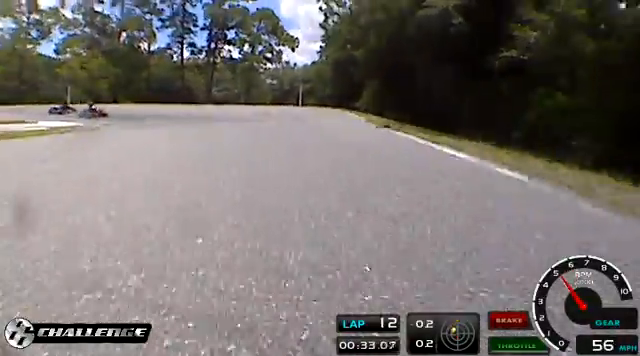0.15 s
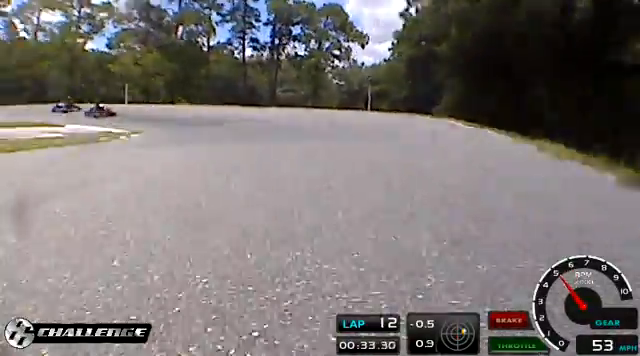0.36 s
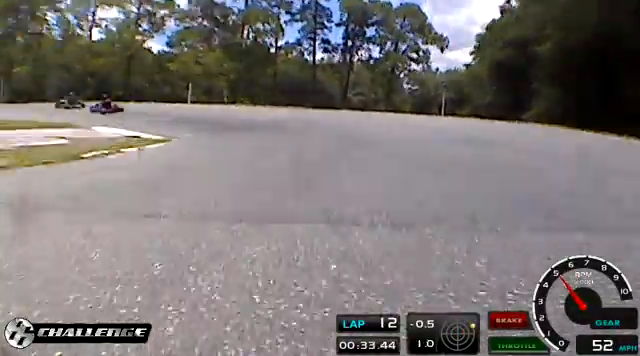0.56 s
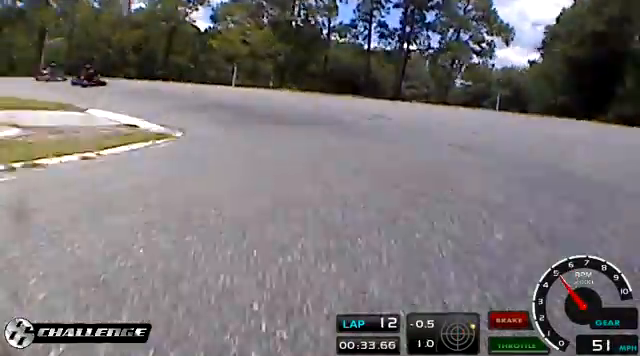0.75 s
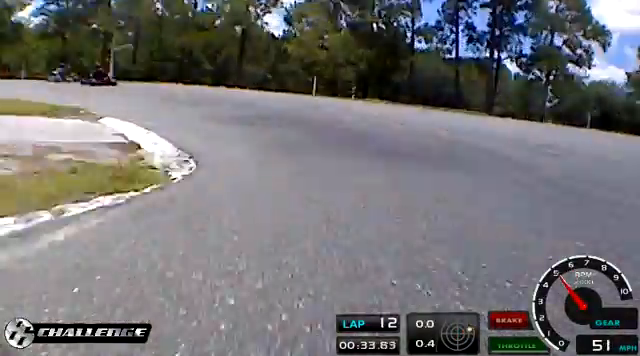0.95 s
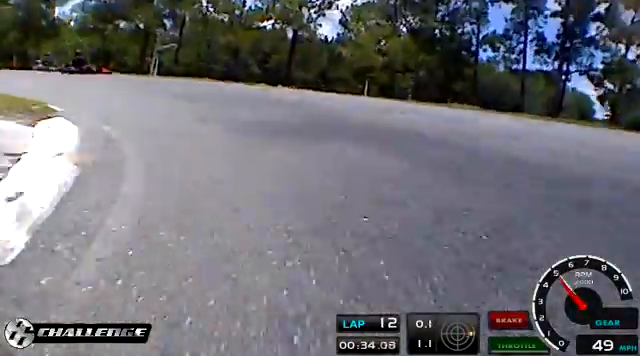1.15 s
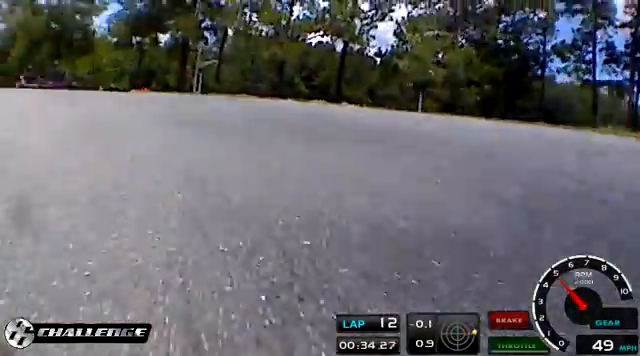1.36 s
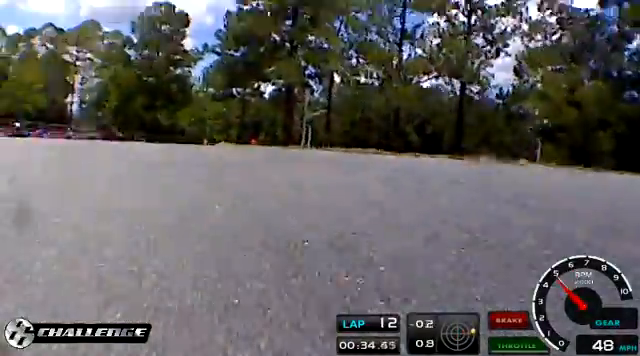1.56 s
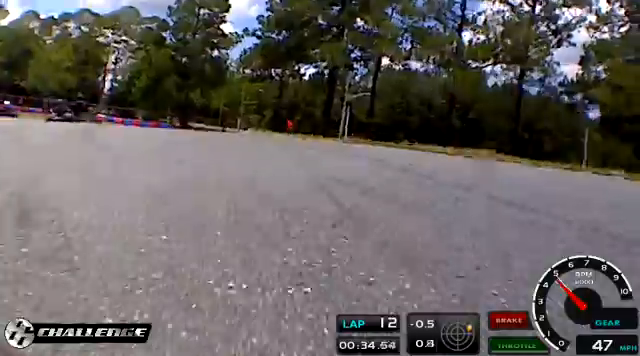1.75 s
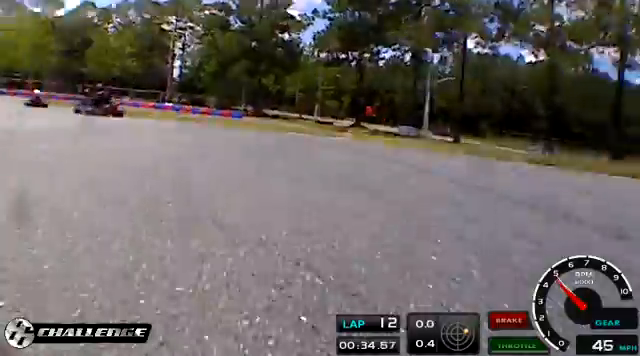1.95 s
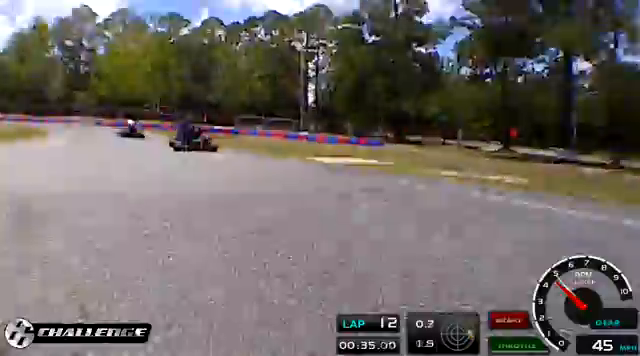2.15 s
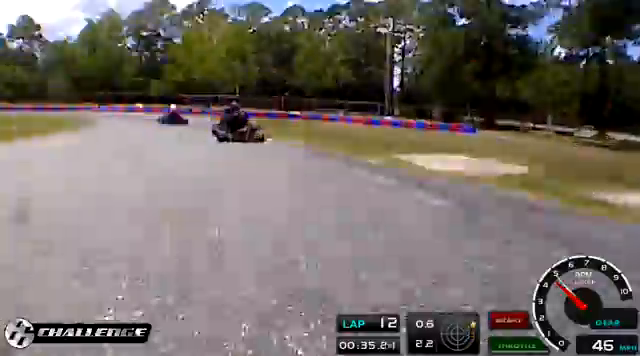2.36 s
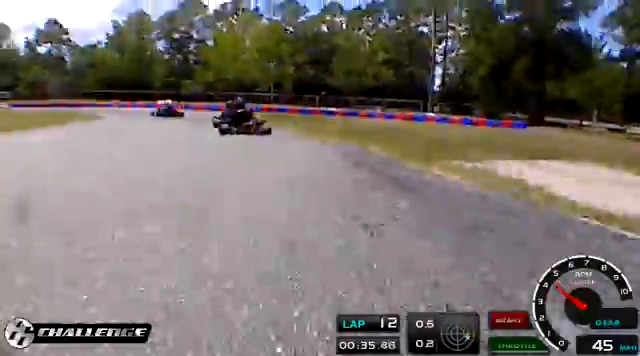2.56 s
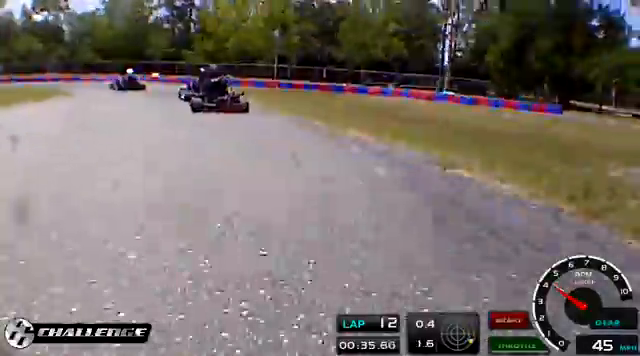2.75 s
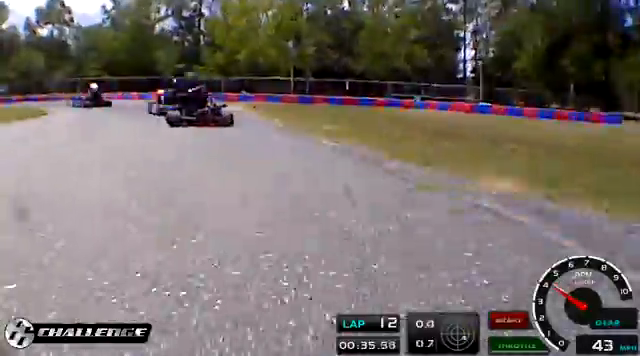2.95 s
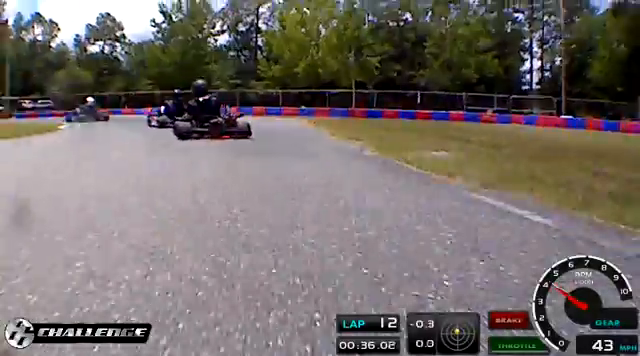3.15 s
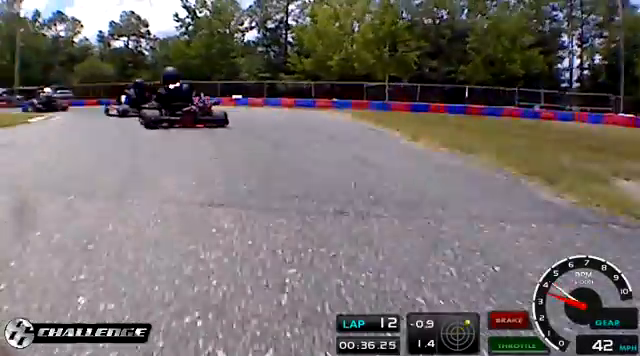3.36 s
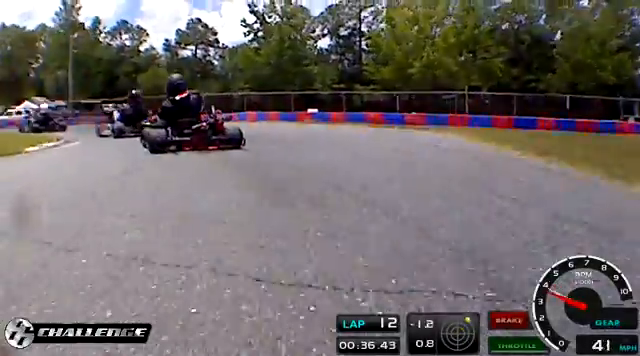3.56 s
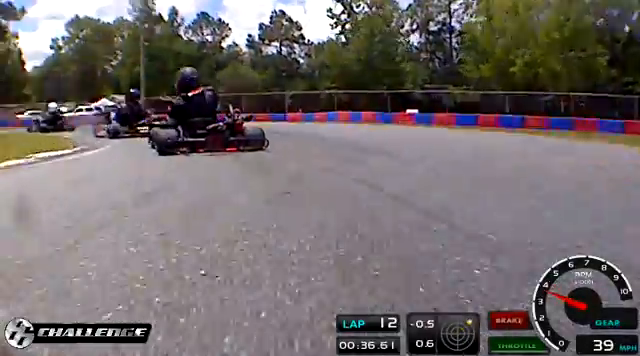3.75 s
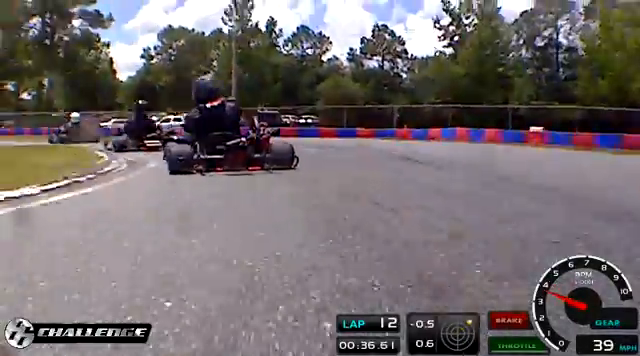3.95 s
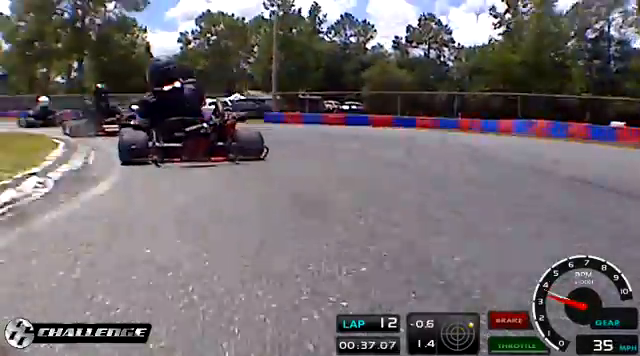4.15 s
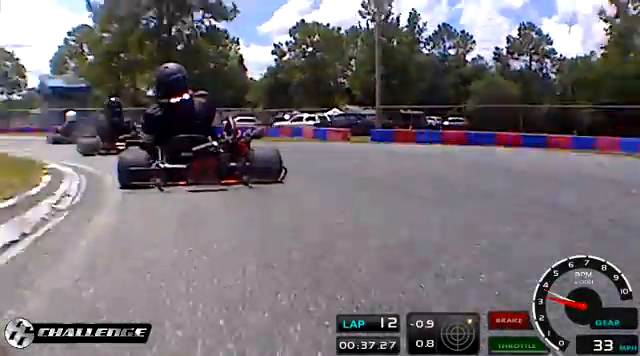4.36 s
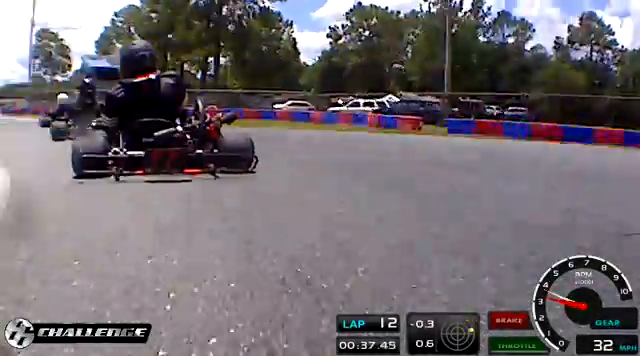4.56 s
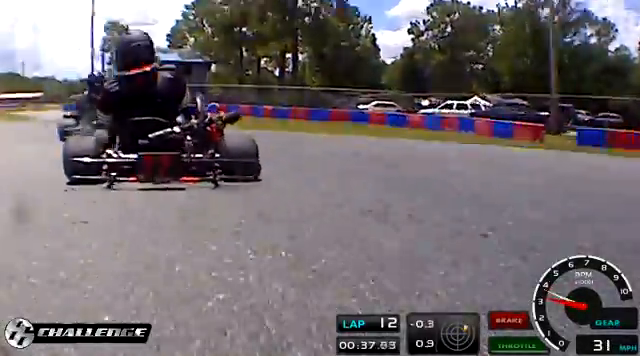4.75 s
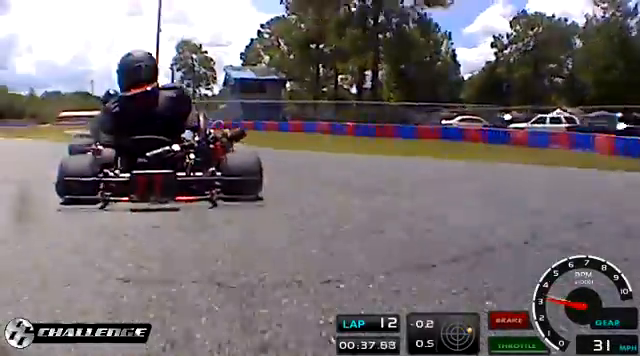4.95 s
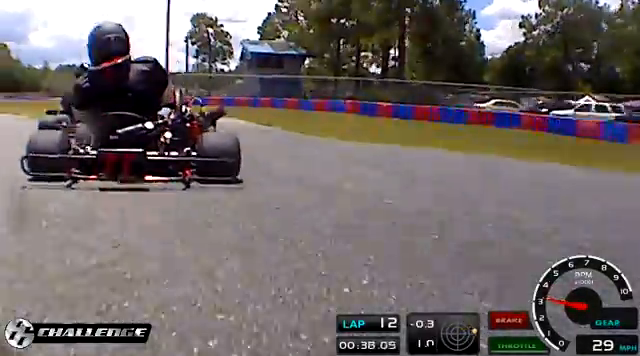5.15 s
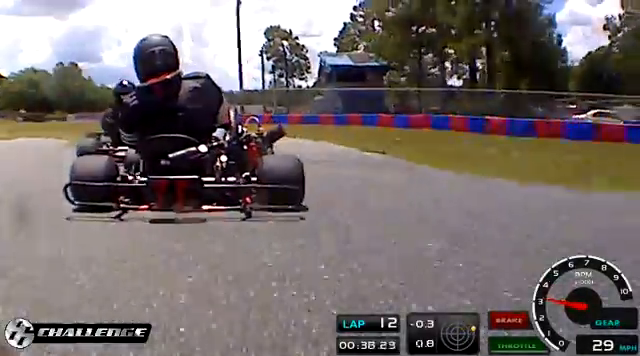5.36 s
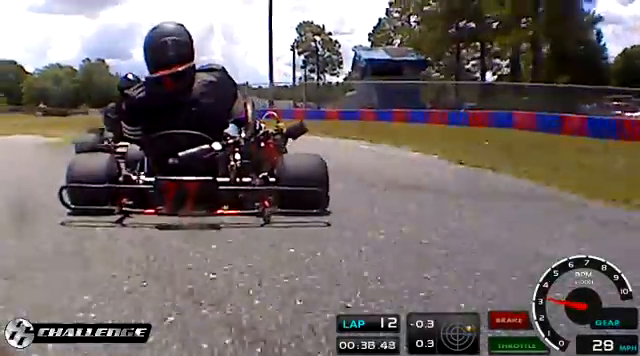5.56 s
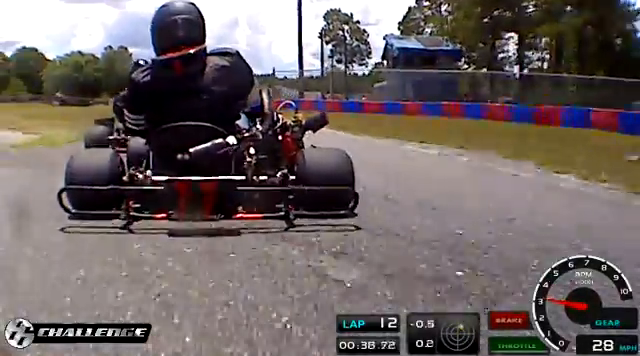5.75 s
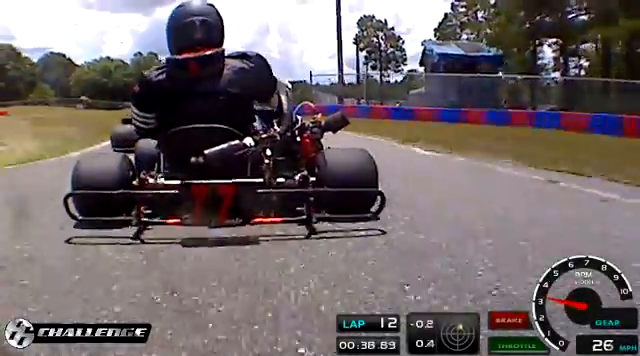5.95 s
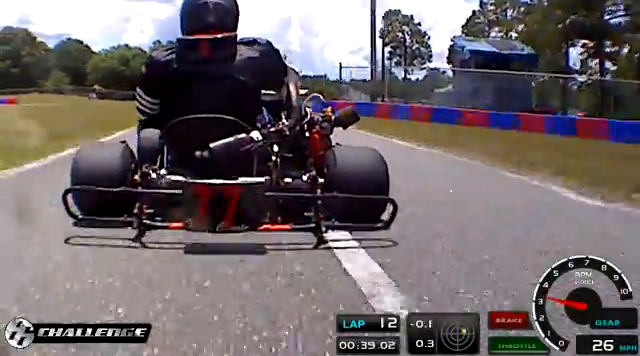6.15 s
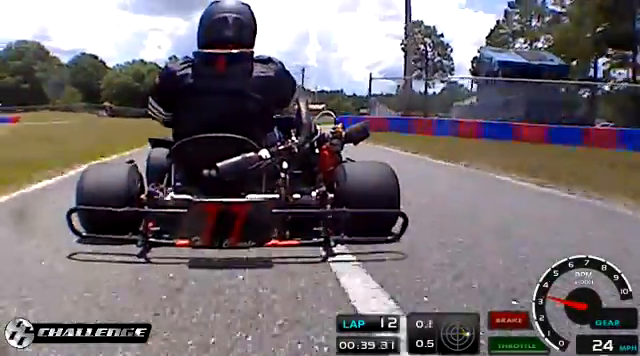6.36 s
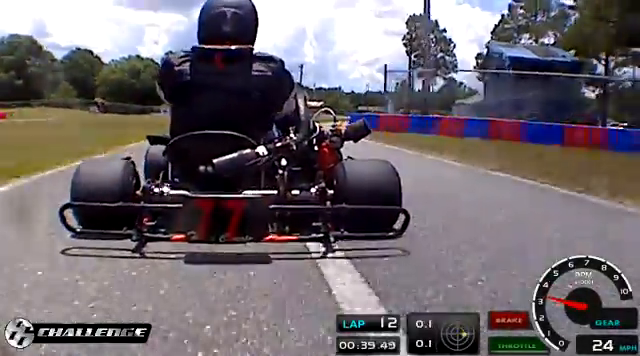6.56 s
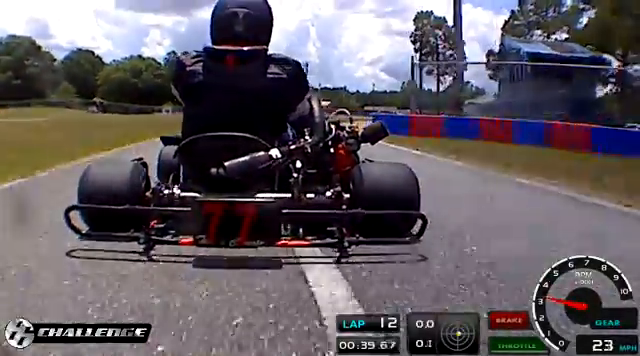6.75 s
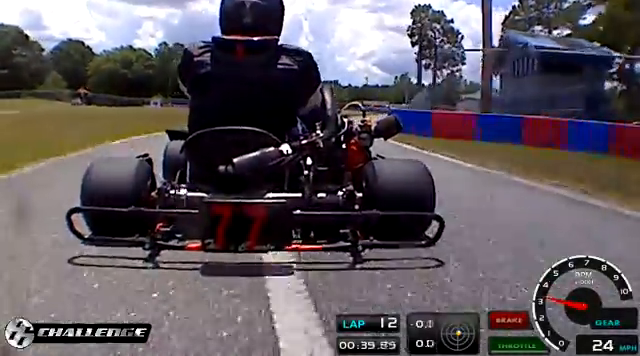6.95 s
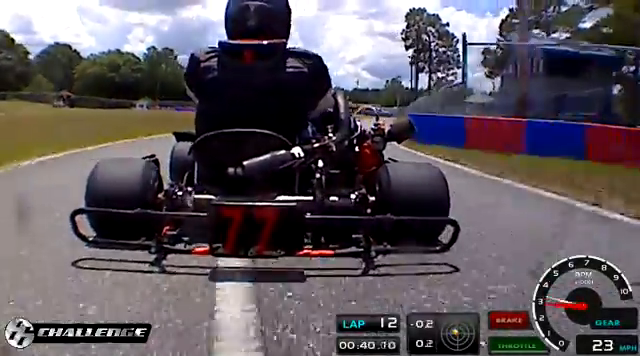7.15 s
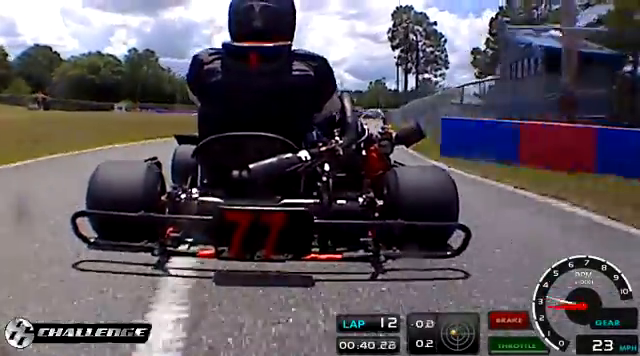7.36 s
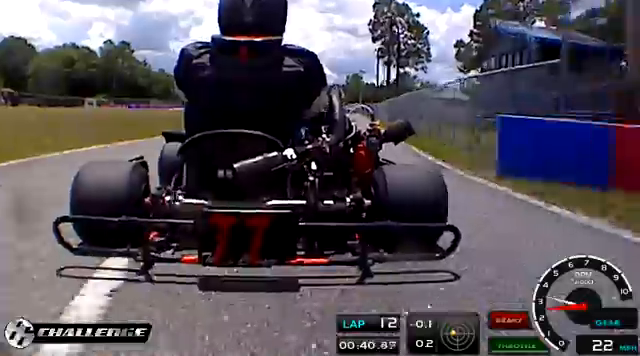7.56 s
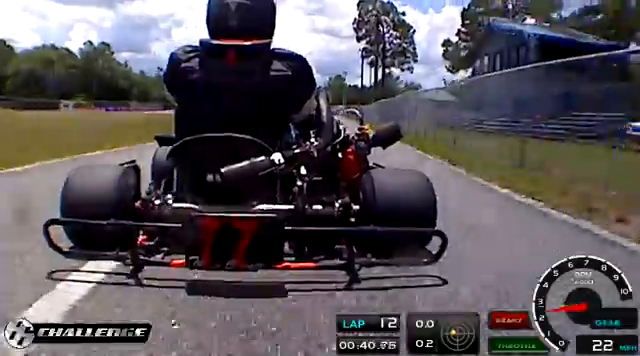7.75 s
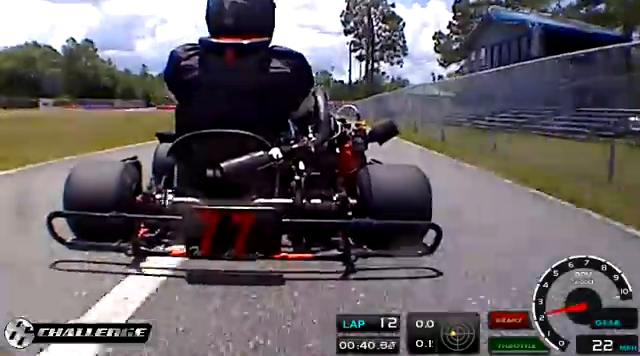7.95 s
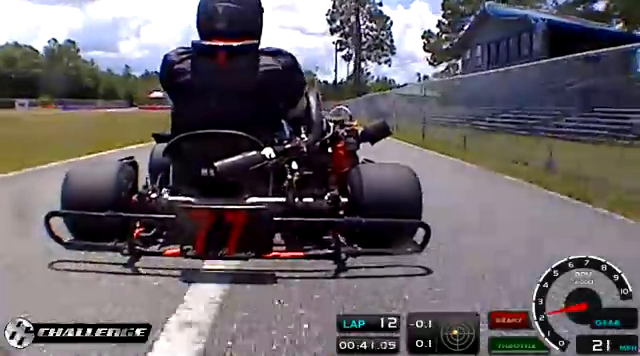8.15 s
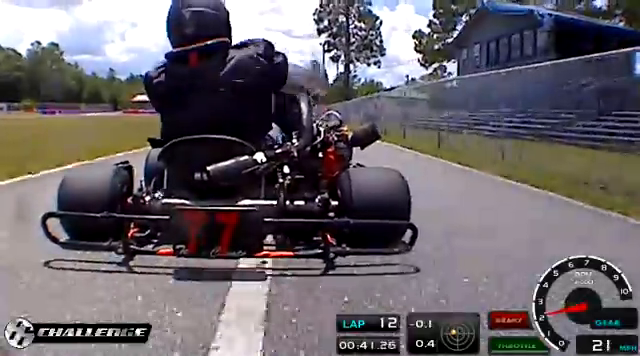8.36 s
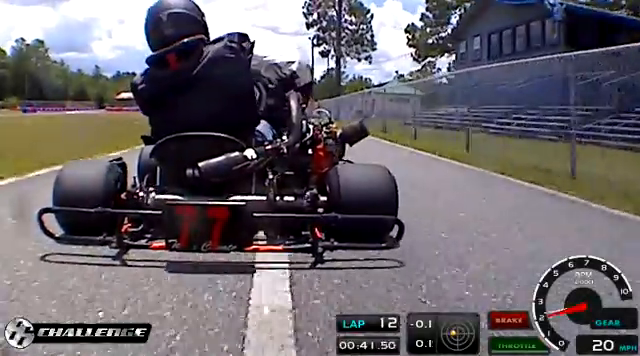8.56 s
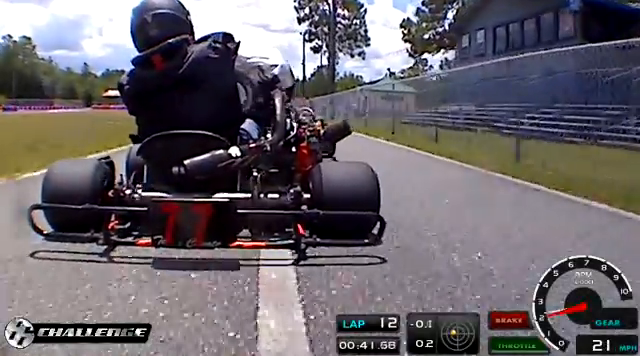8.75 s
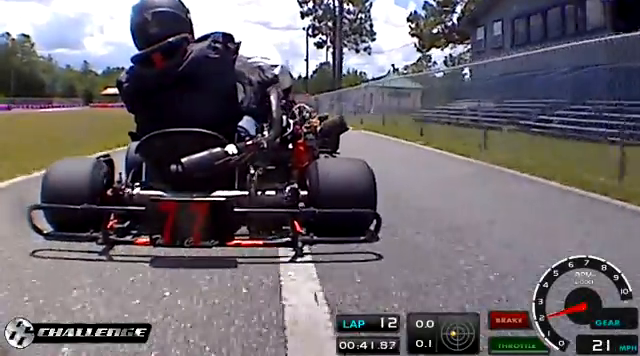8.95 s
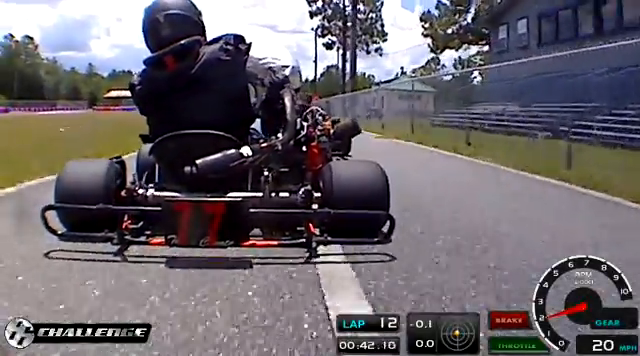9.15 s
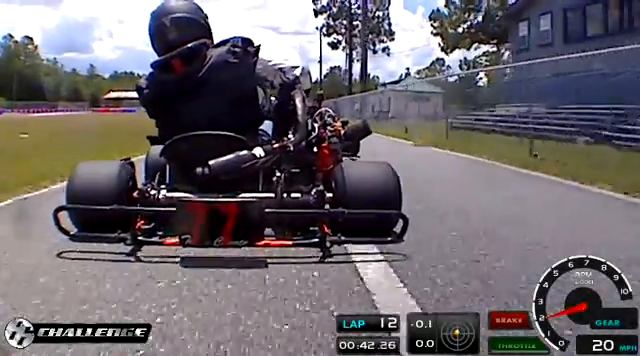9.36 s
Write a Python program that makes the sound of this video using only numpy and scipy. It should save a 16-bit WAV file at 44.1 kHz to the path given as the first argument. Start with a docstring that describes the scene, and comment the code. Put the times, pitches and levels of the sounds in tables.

```python
"""On board a four-stroke racing kart, the microphone shut in a camera case bolted to it: full speed to a crawl.
From the start the crank shakes the frame, firings and rough asphalt boom in the mount, wind drums on the
case, and roar, chatter, rattle and exhaust come through it; fittings knock for six seconds. The sound cuts
out for a fifth of a second at 4.3 s; revs pick up slightly, then metal clacks, likely the brake, from 6.2 s
as the kart slows. A second cut falls at 6.5 s; a slack chain slaps through the crawl, with one last clack."""
import sys
import numpy as np
from scipy import signal
from scipy.fft import rfft, irfft
from scipy.io import wavfile
from scipy.ndimage import uniform_filter1d

SR = 44100
rng = np.random.default_rng(int(sys.argv[2]) if len(sys.argv) > 2 else 0)


def waveform_to_disk(signal):
    """Save audio, clipped to [-1, 1], as 16-bit WAV at the path in sys.argv[1]."""
    frames = np.transpose(np.atleast_2d(signal))
    scaled = np.clip(frames, -1, 1) * 32767
    samples = np.round(scaled).astype(np.int16)
    wavfile.write(sys.argv[1], SR, samples)


N = 414099
TIME = np.arange(N) / SR
REFERENCE_HZ = 80  # crank turns per second at which each layer's _DB level holds
# Every _RISE_DB below is dB per doubling of crank speed.


def undb(db):
    """Turn decibels into an amplitude factor."""
    return 10 ** (np.asarray(db) / 20)


def unit(x):
    """Scale to an RMS of 1."""
    return x / np.sqrt(np.mean(x ** 2))


def noise():
    """White noise of the scene's length."""
    return rng.standard_normal(N)


def curves(rows):
    """Each column of a table as one value a sample."""
    seconds, *columns = np.transpose(rows)
    return [np.interp(TIME, seconds, column) for column in columns]


def swells(events):
    """Level in dB: each event rises and falls as a raised cosine."""
    total_db = 0
    for middle, length, db in events:
        phase = np.clip((TIME - middle) / length, -.5, .5)
        total_db = total_db + db * np.cos(np.pi * phase) ** 2
    return total_db


def walk(rate):
    """Smooth random wander of RMS 1, with a new target 'rate' times a second."""
    hold = int(SR / rate)
    steps = np.repeat(rng.standard_normal(N // hold + 1), hold)
    return unit(uniform_filter1d(steps, hold)[:N])


def colour(x, points, size=8192):
    """Causal minimum-phase filter with the given (Hz, dB) outline."""
    hz, db = np.transpose(points)
    bins_hz = np.arange(size // 2 + 1) * SR / size
    log_gain = np.log(undb(np.interp(np.log(bins_hz + 1), np.log(hz), db)))
    # Folding the cepstrum onto positive time makes the filter minimum-phase.
    cepstrum = irfft(log_gain)[:size // 2]
    cepstrum[1:] *= 2
    impulse = irfft(np.exp(rfft(cepstrum, size)))[:size // 2]
    return signal.fftconvolve(x, impulse)[:N]


def ring(x, modes):
    """Sum of damped resonances, each (Hz, width Hz, dB)."""
    return sum(undb(db) * signal.lfilter(*signal.iirpeak(hz, hz / width, SR), x) for hz, width, db in modes)


def grains(rate, spread_db):
    """Tiny impacts of either sign at random moments, their levels spread exponentially in dB."""
    size = undb(spread_db * np.minimum(rng.exponential(size=N), 4))
    return (rng.random(N) < rate / SR) * size * rng.choice([-1, 1], N)


def turn_starts(turns):
    """Samples at which the crank completes a whole turn."""
    return np.flatnonzero(np.diff(np.floor(turns)) > 0)


def buzz(attack_s, decay_s):
    """One blow: a part chatters against the frame for a few milliseconds."""
    t = np.arange(SR // 15) / SR
    return (1 - np.exp(-t / attack_s)) * np.exp(-t / decay_s) * rng.standard_normal(len(t))


# Engine speed under way. Each row: time in seconds, crank rate in turns per second.
ENGINE_SPEED = [(0.0, 86), (0.5, 84.4), (1.0, 81.7), (1.6, 80), (2.0, 77), (2.5, 72.5), (2.9, 70),
                (3.2, 64.5), (3.5, 61), (4.0, 55), (4.6, 52.6), (5.0, 53.3), (6.0, 56.3), (6.45, 57.5),
                (6.7, 55.5), (7.0, 49.3), (7.3, 44), (7.8, 38.3), (8.3, 35.4), (9.39, 32)]


def engine_speed():
    """Crank rate falls overall, with a slight pick-up before the last slowing."""
    crank_hz, = curves(ENGINE_SPEED)
    return crank_hz


def firings(turns, scatter_db, idle_stroke):
    """A jolt at each top of the stroke: strong when it fires, weaker on the turn between."""
    at = turn_starts(turns)
    jolts = np.zeros(N)
    jolts[at] = undb(scatter_db * rng.standard_normal(len(at))) * np.resize([1, idle_stroke], len(at))
    return jolts


# Gusts at the case. Each row: middle in seconds, length in seconds, swell in dB.
GUST_SWELLS = [(0.64, 0.081, 7), (0.83, 0.22, 7.5), (0.97, 0.14, 8.5), (1.25, 0.12, 2.5), (1.86, 0.2, 12.5),
               (2.0, 0.15, 6.5), (2.14, 0.29, 14), (2.33, 0.27, 9), (2.5, 0.1, 10.5), (2.67, 0.2, 12),
               (2.89, 0.053, 11), (3.0, 0.19, 5)]
GUST_IN_ROAR, GUST_IN_CHATTER, GUST_IN_RUMBLE = 0.54, 0.36, 0.65  # share of a gust's dB swell


def gusts():
    """Gusts swell the wind fully, and roar, chatter and rumble in part."""
    return swells(GUST_SWELLS)


# Bumps in the asphalt, and smooth patches with negative swell.
# Each row: middle in seconds, length in seconds, swell in dB.
ROAD_SWELLS = [(0.43, 0.14, 6.5), (0.83, 0.14, 11.5), (0.98, 0.21, 6), (1.26, 0.096, 10), (1.5, 0.25, 3.5),
               (1.63, 0.11, -22), (1.87, 0.055, 4.5), (2.0, 0.19, 6), (2.1, 0.18, -14), (2.17, 0.052, 8),
               (2.5, 0.14, 3), (2.66, 0.31, 6), (2.8, 0.16, 10), (2.97, 0.085, 12), (3.215, 0.081, 14),
               (3.46, 0.078, 8.5), (3.65, 0.2, 10.5), (3.8, 0.13, 9), (4.24, 0.15, 9.5), (5.05, 0.29, 11),
               (5.17, 0.11, 3.5), (5.36, 0.092, 6.5), (5.88, 0.19, -6), (5.95, 0.084, 9.5),
               (6.04, 0.032, 14.5), (6.27, 0.14, 10.5), (6.41, 0.071, 6), (6.73, 0.53, -6.5),
               (7.3, 0.23, -10), (7.54, 0.13, 5.5)]


def road_swells():
    """Bumps make mount and bodywork boom louder; smooth patches calm them."""
    return swells(ROAD_SWELLS)


# Loudness beyond what speed gives.
# Each row: time in seconds, change of roar and exhaust in dB, change of chatter and rattle in dB.
HARSHNESS_CURVES = [(0, -1, 1), (0.9, 1, 3.5), (1.6, -0.5, 0), (3.0, 0.5, 3.5), (3.5, 0.5, 2.5),
                    (4.1, 1, 4.5), (4.6, -0.5, 1), (5.7, -0.5, 3), (6.3, 0.5, 2), (6.72, 2, 2),
                    (7.1, -4, -0.5), (7.5, -2, -3), (7.8, -3.5, 0.5), (8.15, -3.5, -2.5), (8.7, 0.5, 0.5),
                    (9.1, 0.5, -1.5), (9.39, 3, 3.5)]


def harshness():
    """Roar and chatter drift in level along the way."""
    return curves(HARSHNESS_CURVES)


# Harmonics and half-orders of the crank.
# Each row: multiple of the crank rate, relative level in dB, extra rise in dB per doubling of speed.
CRANK_ORDERS = [(1, 0.5, 0), (1.5, -17.5, 1), (2, -7, 1), (3, -20, -1.5), (4, -25.5, -5.5), (5, -34, -1)]
# How readily the frame follows a shake. Each row: frequency in Hz, response in dB.
FRAME_RESPONSE = [(33, -13), (43, -14.5), (48.5, -1), (52.5, -4), (56, -11), (64, -11), (71, -4), (76, -5),
                  (80, -3), (84, 0.5), (90, -3), (102, -14.5), (124, 4), (142, -3), (152, -16.5),
                  (160, -8.5), (169, -2.5), (205, -1.5), (235, -5), (258, 0), (300, -9.5), (325, -12),
                  (340, -2)]
SHAKE_DB, SHAKE_RISE_DB = -11, 15


def shake(turns, crank_hz, speed):
    """Crank, piston and firings rock the frame; each order swells as it slides through a resonance."""
    angle = 2 * np.pi * turns - np.pi / 2 + .05 * walk(25)
    frame_hz, frame_db = np.transpose(FRAME_RESPONSE)
    out = 0
    for multiple, db, rise_db in CRANK_ORDERS:
        response_db = np.interp(multiple * crank_hz, frame_hz, frame_db)
        level_db = db + rise_db * speed + response_db + walk(22)
        out = out + undb(level_db) * np.cos(multiple * angle)
    return out


# Colour of the chassis rumble. Each row: frequency in Hz, relative level in dB.
RUMBLE_COLOUR = [(10, -22), (18, -10), (28, -3), (40, -2), (50, 7.5), (62, 1.5), (85, 7), (115, 1.5),
                 (200, -54.5)]
RUMBLE_DB, RUMBLE_RISE_DB = -27.5, 10


def rumble():
    """The chassis rumbles as steady low noise."""
    return unit(colour(noise(), RUMBLE_COLOUR))


WIND_DB, WIND_RISE_DB = -30, 22.5


def buffet():
    """Eddies drum on the case: low noise that wanders quickly in level."""
    eddies = noise() * undb(3.0 * walk(40))
    outline = [(130, -14), (180, 5.5), (230, 0.5), (262, 0.5), (305, -12.5), (600, -36.0), (4000, -86)]
    return unit(colour(eddies, outline))


# Main modes of the camera mount. Each row: frequency in Hz, width in Hz, relative level in dB.
MOUNT_MODES = [(139.7, 8, -3.5), (147.26, 5.9, 0.5)]
# Weaker modes of the bodywork round it. Each row: frequency in Hz, width in Hz, relative level in dB.
BODYWORK_MODES = [(105.3, 10, 1), (185.3, 23, -3.5), (263.2, 24, 1.5)]
BOOM_DB, BOOM_RISE_DB = -18, 12.5
BODYWORK_DB, BODYWORK_RISE_DB = -10, 3.5  # relative to the mount
BUMP_IN_BODYWORK = 0.37  # share of a bump's dB swell


def boom(jolts, roughness, crank_hz, modes):
    """Firings and asphalt ring a part of the kart; the road's share grows with speed."""
    road = np.interp(crank_hz, [36, 56, 75], [.7, 1.1, 1.6])
    push = unit(jolts / np.sqrt(crank_hz)) + road * unit(np.sqrt(roughness) * noise())
    ringing = ring(push / np.hypot(1, road), modes)
    outline = [(40, -16.0), (75, 1.0), (110, 2.5), (162, 0.5), (185, -3), (270, -6), (400, -20.5),
               (900, -45.0), (4000, -84.5)]
    return unit(colour(ringing, outline))


# Colour of the roar inside the case. Each row: frequency in Hz, relative level in dB.
ROAR_COLOUR = [(140, -25.5), (200, 1.5), (260, 4), (350, -1), (410, 1), (470, -0.5), (540, 1.5), (700, 1.5),
               (920, 0.5), (1080, -0.5), (1250, -15.5), (1500, -13), (2200, -29), (8000, -62)]
ROAR_DB, ROAR_RISE_DB = -28, 12.5


def roar(jolts, roughness, stroke):
    """Tyres, wind and exhaust gas as gritty noise, surging with the road and once every two turns."""
    grit = unit(grains(2500, spread_db=-4.0)) + 0.64 * noise()
    surging = unit(grit * roughness * (1 + 0.17 * stroke))
    return unit(colour(surging + 0.25 * unit(jolts), ROAR_COLOUR))


# Pitches at which fittings ring in turn, in Hz.
FITTING_PITCHES = [1630, 1930, 2120, 2490, 3060]
# Colour of the chatter inside the case. Each row: frequency in Hz, relative level in dB.
CHATTER_COLOUR = [(900, -12.5), (1450, -5), (1680, 0), (2050, -1), (2350, -5.5), (3200, -6.5), (3700, -11),
                  (4350, -21), (4820, -18), (5400, -23.5), (6900, -27), (7600, -39), (8600, -52.5)]
CHATTER_DB, CHATTER_RISE_DB = -34, 12.5
PART_WIDTH_HZ = 190  # width of a loose part's own ring


def chatter(roughness, stroke):
    """Chain and fittings tick densely, surging every two turns; now one fitting rings out, now another."""
    ticks = unit(grains(1800, spread_db=1.8)) + .7 * noise()
    ticks = ticks * roughness * (1 + 0.29 * stroke)
    rings = 0
    for hz in FITTING_PITCHES:
        rings = rings + undb(4 * walk(24)) * ring(ticks, [(hz, PART_WIDTH_HZ, -9)])
    return unit(colour(ticks + rings, CHATTER_COLOUR))


# Colour of the small loose parts. Each row: frequency in Hz, relative level in dB.
RATTLE_COLOUR = [(300, -16.5), (800, -4), (1200, -2.5), (1400, 1.5), (2000, -4.5), (3200, -11.5),
                 (4100, -9), (4900, -11), (5700, -16.5), (7000, -17), (8300, -33)]
RATTLE_DB, RATTLE_RISE_DB = -8, 0.5  # relative to the chatter


def rattle(turns, spread_db, decay_s):
    """Loose parts land up to 12 ms after each top of the stroke with a short buzz, now and then hard."""
    at = turn_starts(turns)
    late, force = rng.random((len(at), 2)).T
    hops = np.zeros(N + SR)
    hops[at + (late * .012 * SR).astype(int)] = undb(spread_db * force ** 3)
    envelope = signal.lfilter([1], [1, -np.exp(-1 / (decay_s * SR))], hops[:N])
    return unit(colour(envelope * noise(), RATTLE_COLOUR))


# Resonances of the exhaust pipe. Each row: frequency in Hz, width in Hz, relative level in dB for one pass.
PIPE_MODES = [(282.8, 71, -2), (388.3, 13, -2), (468, 50, 0)]
EXHAUST_DB, EXHAUST_RISE_DB = -40, 6


def exhaust(jolts, stroke):
    """Firings and puffs of gas every two turns ring the pipe; it stands out once the roar has fallen."""
    puffs = unit(jolts) + 1.1 * unit(stroke * noise())
    once = ring(puffs, PIPE_MODES)
    return unit(ring(once, PIPE_MODES))


def strikes(events, outline, attack_s, decay_s, ring_db):
    """A loose part buzzes briefly against the frame and rings at its own pitch."""
    out = np.zeros(N + SR)
    for s, db, own_hz in events:
        i, blow = int(s * SR), buzz(attack_s, decay_s)
        out[i:i + len(blow)] += undb(db) * (blow + ring(blow, [(own_hz, PART_WIDTH_HZ, ring_db)]))
    return colour(out[:N], outline)


# Knocks of loose fittings. Each row: start in seconds, relative level in dB, the part's ring in Hz.
KNOCK_EVENTS = [(0.239, -28, 2010), (0.654, -25, 2900), (0.761, -11, 1470), (0.796, -12.5, 3000),
                (0.83, -15.5, 1400), (0.9535, -12.5, 3100), (1.2235, -21, 3000), (1.503, -15, 1600),
                (1.586, -17, 940), (1.8465, -13, 1520), (1.998, -13.5, 950), (2.164, -12, 1600),
                (2.2, -14, 1450), (2.233, -30, 3000), (2.247, -14.5, 1550), (2.324, -16, 2250),
                (2.345, -16, 2300), (2.381, -13.5, 560), (2.4615, -17.5, 1000), (2.595, -22, 1550),
                (2.6225, -15, 2100), (2.698, -17, 1250), (2.885, -12, 2900), (2.989, -13, 930),
                (3.088, -16, 1900), (3.573, -20.5, 1700), (3.826, -23, 4800), (3.949, -20, 3270),
                (4.112, -21, 4770), (4.2405, -20, 1000), (5.021, -22.5, 3200), (5.919, -21, 2000),
                (5.94, -19.5, 1920), (6.029, -20, 3200)]
# Colour of a knock. Each row: frequency in Hz, relative level in dB.
KNOCK_COLOUR = [(120, -5.5), (250, 4), (500, 4.5), (900, 1.5), (1300, -10.5), (2000, -3), (3200, -7),
                (4100, -7.5), (4900, -14.5), (5700, -14), (7000, -23), (8500, -33.5)]
KNOCK_DB = 5  # gain


def knocks():
    """Loose fittings strike the frame: short buzzes, each with a ring of its own."""
    return strikes(KNOCK_EVENTS, KNOCK_COLOUR, attack_s=0.00053, decay_s=0.0048, ring_db=4)


# Metallic clacks, likely the brake as the kart slows. Each row: start in seconds, relative level in dB.
CLACK_EVENTS = [(6.1552, -18.5), (6.2252, -20), (6.2335, -14.5), (6.2512, -16), (6.262, -26),
                (6.2978, -18.5), (6.3052, -15.5), (6.3238, -13), (6.368, -18.5), (6.394, -21), (6.411, -19),
                (6.4302, -17), (6.4395, -20.5), (6.482, -18.5), (6.692, -18.5), (6.702, -22), (6.7122, -18),
                (6.73, -26), (6.754, -22), (9.3598, -25)]
# Modes of the clacking metal. Each row: frequency in Hz, width in Hz, relative level in dB.
METAL_MODES = [(1940, 87, 0.5), (2360, 100, -1), (2580, 140, 1.5), (3220, 100, -0.5), (4140, 210, 2.5),
               (4720, 220, 0.5), (5820, 190, 7), (6890, 220, 1.5)]
# Colour of a clack. Each row: frequency in Hz, relative level in dB.
CLACK_COLOUR = [(500, -5), (1400, -22), (1900, 4.5), (2500, -2), (3200, 0.5), (4100, -12.5), (4900, -11.5),
                (5700, -17.5), (7000, -17.5), (7700, -38), (8600, -27)]
CLACK_DB = 1.5  # gain


def clacks(attack_s, decay_s, ring_db, scatter_db):
    """Metal strikes metal; each blow lands elsewhere and favours other modes."""
    out = np.zeros(N + SR)
    for s, db in CLACK_EVENTS:
        i, blow = int(s * SR), buzz(attack_s, decay_s)
        modes = [(hz, width, mode_db + ring_db + scatter_db * rng.standard_normal())
                 for hz, width, mode_db in METAL_MODES]
        out[i:i + len(blow)] += undb(db) * (blow + ring(blow, modes))
    return colour(out[:N], CLACK_COLOUR)


# Slaps of the slack chain. Each row: start in seconds, relative level in dB, the struck part's ring in Hz.
SLAP_EVENTS = [(6.785, -28, 3200), (6.844, -39, 2000), (6.959, -40, 2000), (7.098, -27.5, 2050),
               (7.174, -31, 2090), (7.394, -30, 1900), (7.413, -33, 3220), (7.675, -34, 2000),
               (8.273, -32, 3100), (8.303, -36, 1700), (8.365, -34, 2200), (8.449, -34, 4950),
               (8.4845, -31.5, 2000), (8.5335, -34, 2600), (8.594, -31.5, 5200), (8.6335, -36, 1200),
               (8.6965, -31.5, 1740), (8.729, -34.5, 1400), (8.7595, -32, 1300), (8.7795, -36, 1390),
               (8.802, -32, 5200), (8.8168, -36, 1900), (8.828, -30, 5300), (8.863, -37, 5170),
               (8.8715, -30.5, 1100), (8.902, -36, 2080), (8.973, -35, 5000), (9.045, -39, 5400),
               (9.112, -34, 5200), (9.133, -44, 4900), (9.2152, -33, 2125), (9.233, -32, 5000),
               (9.285, -31.5, 5050), (9.33, -34, 2090), (9.348, -36, 5500)]
# Colour of a slap. Each row: frequency in Hz, relative level in dB.
SLAP_COLOUR = [(300, -6), (800, 3), (1150, -6), (1400, 3), (2000, -1), (3200, -4.5), (4100, -13),
               (4900, -14), (5700, -17.5), (7000, -21), (8300, -46)]
SLAP_DB = 3.5  # gain


def chain_slaps():
    """At a crawl the slack chain slaps parts, which buzz and ring."""
    return strikes(SLAP_EVENTS, SLAP_COLOUR, attack_s=0.00067, decay_s=0.0061, ring_db=6)


# Resonances of the camera case. Each row: frequency in Hz, width in Hz, relative level in dB.
CASE_MODES = [(467, 31, -6), (1670, 100, -9), (3015, 40, -8.5), (4883, 150, 1), (6800, 75, -8.5)]


def through_case(high):
    """The closed case adds its own resonances to what passes through it."""
    return high + ring(high, CASE_MODES)


def scene():
    """Speed sets the steady layers' levels; bumps and gusts swell them on the way to the microphone."""
    crank_hz = engine_speed()
    speed = np.log2(crank_hz / REFERENCE_HZ)  # in doublings
    turns = np.cumsum(crank_hz) / SR
    jolts = firings(turns, scatter_db=1.2, idle_stroke=.25)
    stroke = np.exp(-(turns / 2 % 1) / 0.14)  # jumps up every two turns, then dies away
    roughness = undb(1.27 * walk(45) + walk(220))

    gust_db, bump_db = gusts(), road_swells()
    harsh_roar_db, harsh_chatter_db = harshness()
    rumble_db = RUMBLE_DB + RUMBLE_RISE_DB * speed + GUST_IN_RUMBLE * gust_db
    boom_db = BOOM_DB + BOOM_RISE_DB * speed
    bodywork_db = boom_db + BODYWORK_DB + BODYWORK_RISE_DB * speed + BUMP_IN_BODYWORK * bump_db
    roar_db = ROAR_DB + ROAR_RISE_DB * speed + GUST_IN_ROAR * gust_db + harsh_roar_db
    chatter_db = CHATTER_DB + CHATTER_RISE_DB * speed + GUST_IN_CHATTER * gust_db + harsh_chatter_db
    rattle_db = chatter_db + RATTLE_DB + RATTLE_RISE_DB * speed
    exhaust_db = EXHAUST_DB + EXHAUST_RISE_DB * speed + harsh_roar_db

    low = undb(SHAKE_DB + SHAKE_RISE_DB * speed) * shake(turns, crank_hz, speed)
    low += undb(rumble_db) * rumble()
    low += undb(WIND_DB + WIND_RISE_DB * speed + gust_db) * buffet()
    low += undb(boom_db + bump_db) * boom(jolts, roughness, crank_hz, MOUNT_MODES)
    low += undb(bodywork_db) * boom(jolts, roughness, crank_hz, BODYWORK_MODES)

    high = undb(roar_db) * roar(jolts, roughness, stroke)
    high += undb(chatter_db) * chatter(roughness, stroke)
    high += undb(rattle_db) * rattle(turns, spread_db=8, decay_s=0.0068)
    high += undb(exhaust_db) * exhaust(jolts, stroke)
    high += undb(KNOCK_DB) * knocks()
    high += undb(CLACK_DB) * clacks(attack_s=0.00066, decay_s=0.0047, ring_db=2.5, scatter_db=1.0)
    high += undb(SLAP_DB) * chain_slaps()
    return (low + through_case(high))[None]


# Silences. Each row: start in seconds, end in seconds.
DROPOUTS = [(4.2917, 4.4909), (6.4925, 6.6908)]
TOP_HZ = 8100  # the treble is cut above this


def record(dry):
    """The camera flattens the highest peaks, drops out twice and cuts the treble."""
    ceiling, fade_s = .71, .0015
    sound = dry / (1 + (dry / ceiling) ** 8) ** (1 / 8)
    for start, end in DROPOUTS:
        outside_s = np.maximum(start - TIME, TIME - end + fade_s / 2)
        sound = sound * np.clip(outside_s / fade_s, 0, 1)
    return signal.sosfilt(signal.butter(20, TOP_HZ, fs=SR, output="sos"), sound)


dry = scene()
out = record(dry)
waveform_to_disk(out)
```